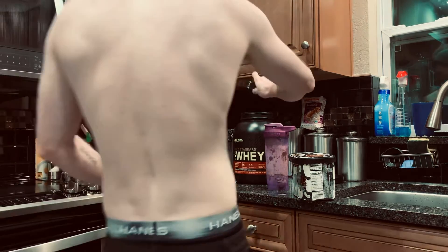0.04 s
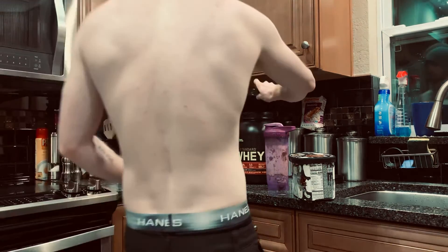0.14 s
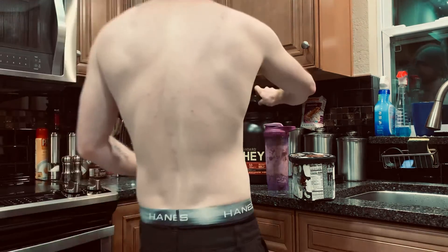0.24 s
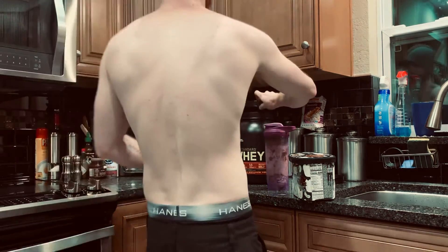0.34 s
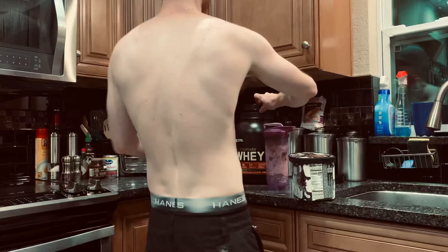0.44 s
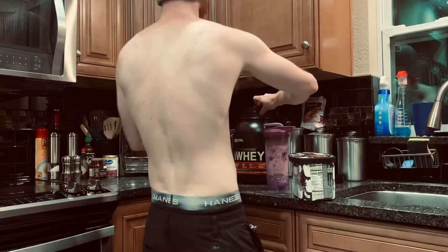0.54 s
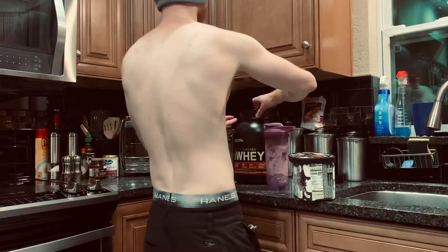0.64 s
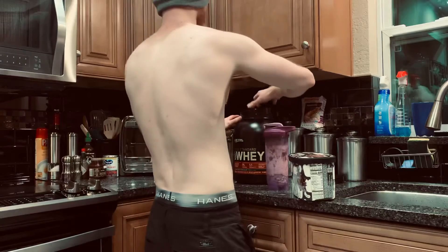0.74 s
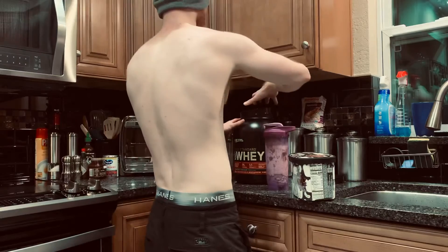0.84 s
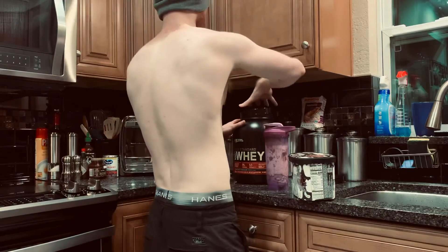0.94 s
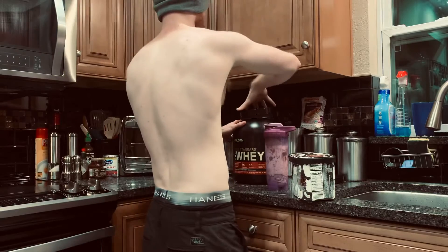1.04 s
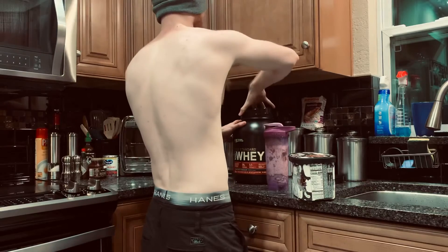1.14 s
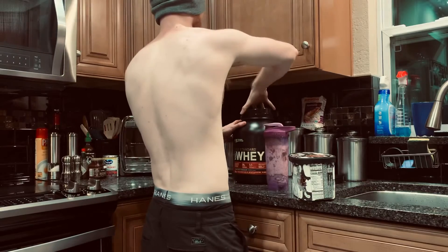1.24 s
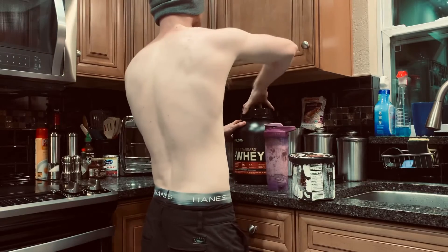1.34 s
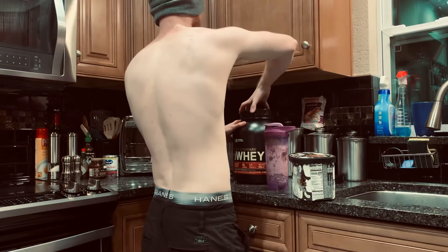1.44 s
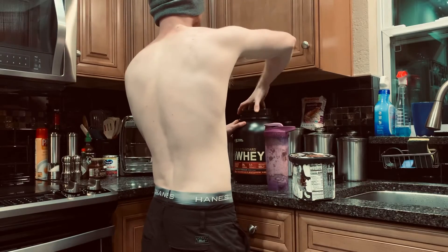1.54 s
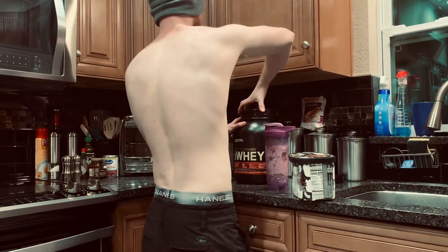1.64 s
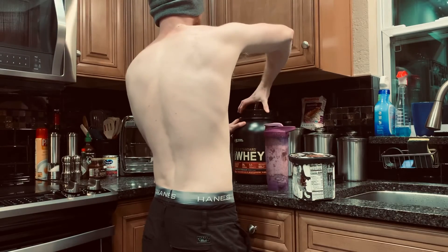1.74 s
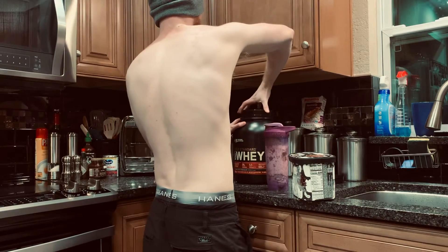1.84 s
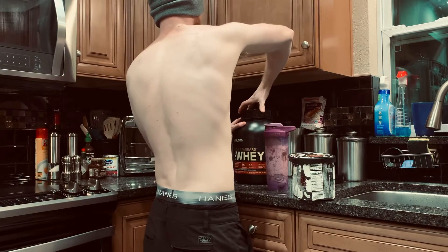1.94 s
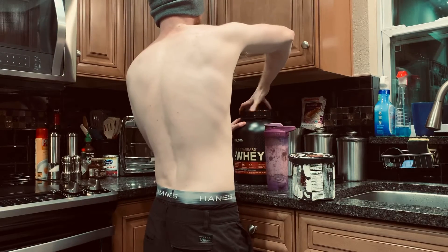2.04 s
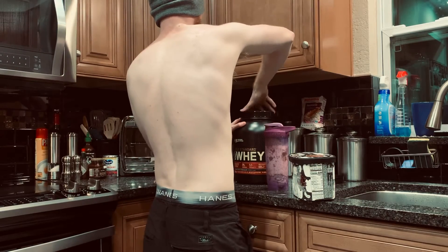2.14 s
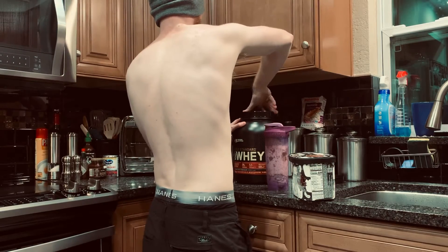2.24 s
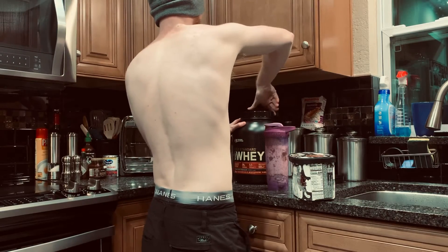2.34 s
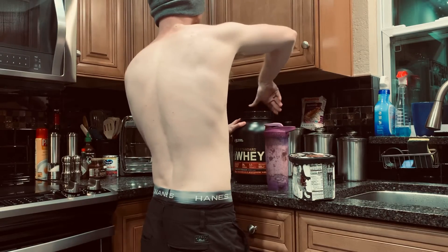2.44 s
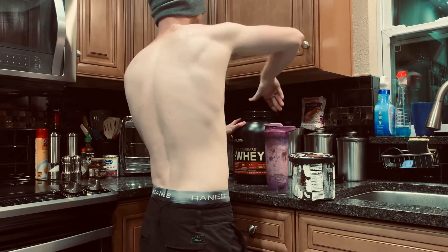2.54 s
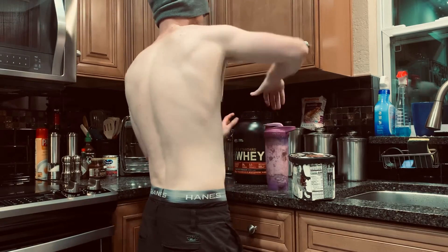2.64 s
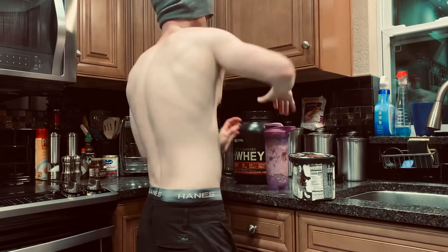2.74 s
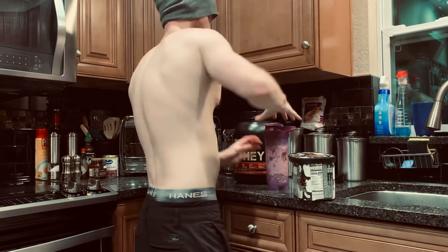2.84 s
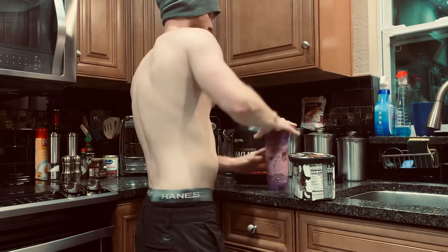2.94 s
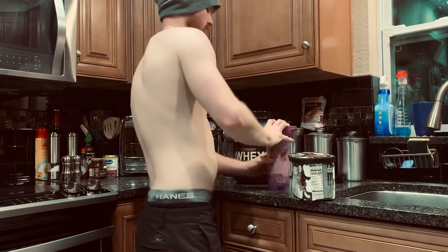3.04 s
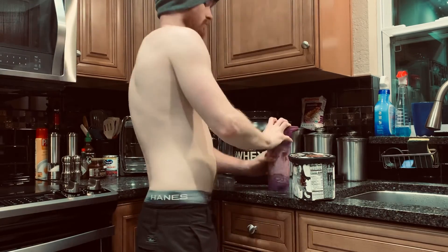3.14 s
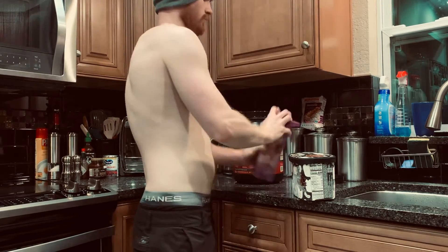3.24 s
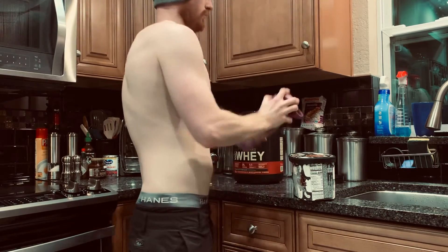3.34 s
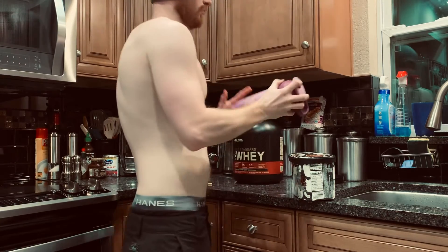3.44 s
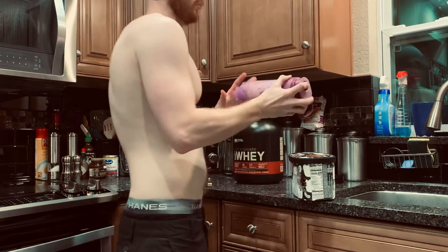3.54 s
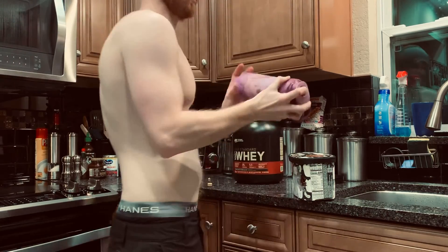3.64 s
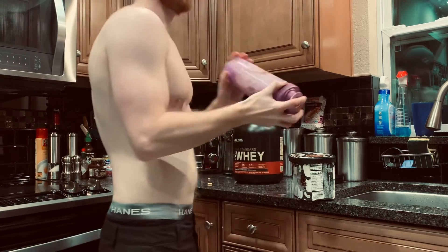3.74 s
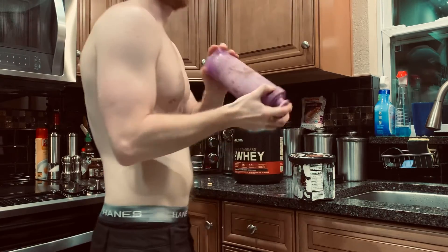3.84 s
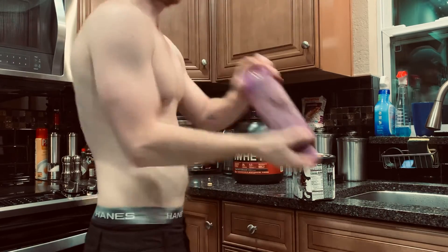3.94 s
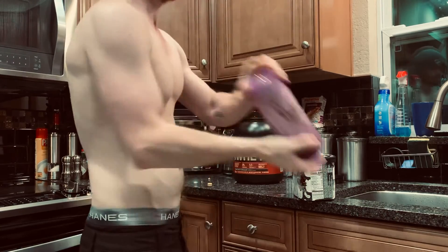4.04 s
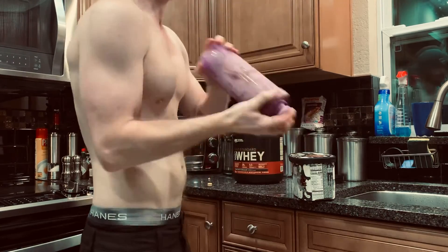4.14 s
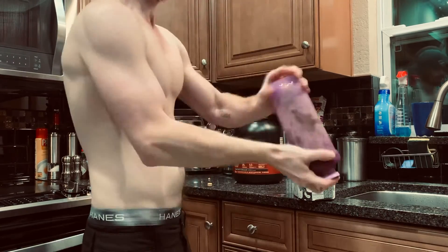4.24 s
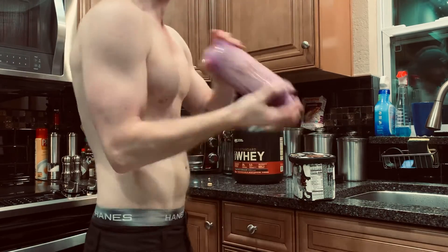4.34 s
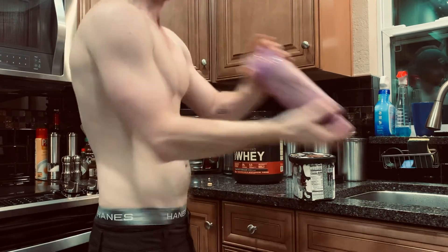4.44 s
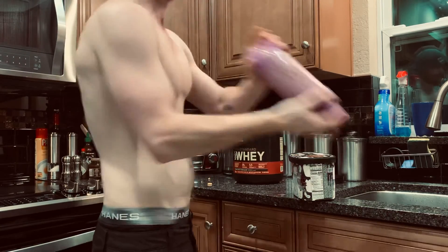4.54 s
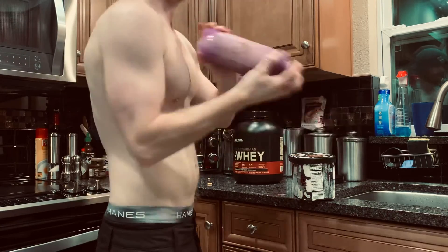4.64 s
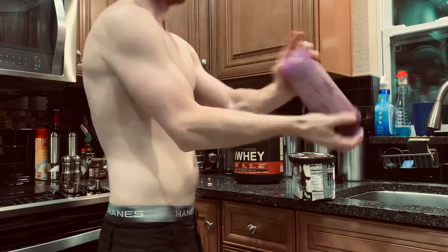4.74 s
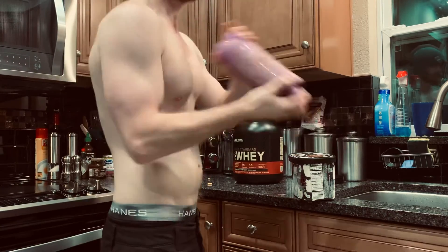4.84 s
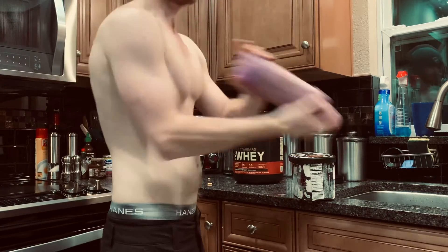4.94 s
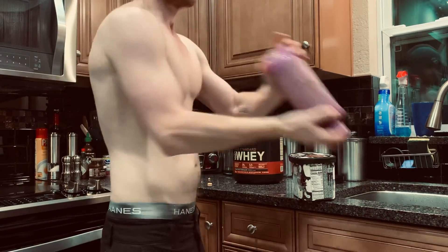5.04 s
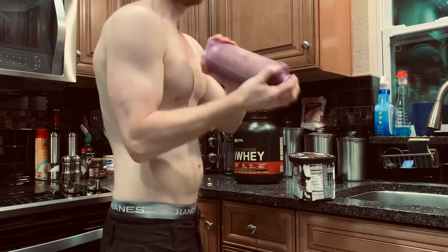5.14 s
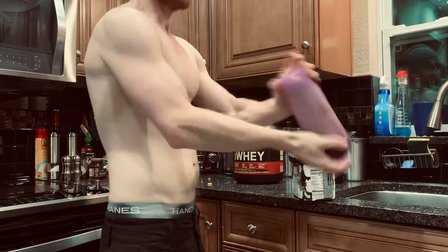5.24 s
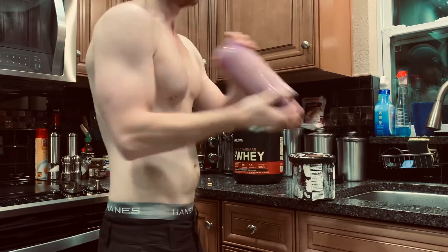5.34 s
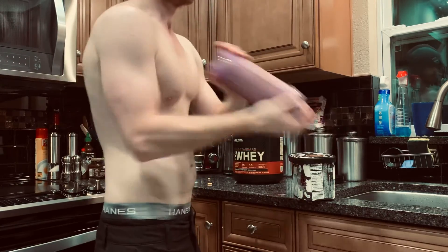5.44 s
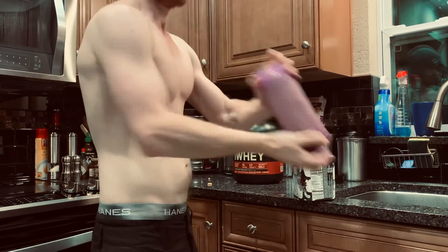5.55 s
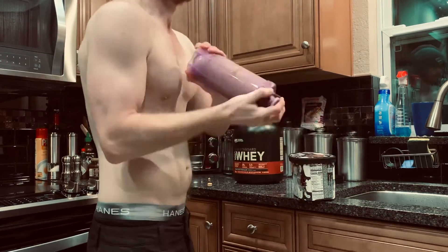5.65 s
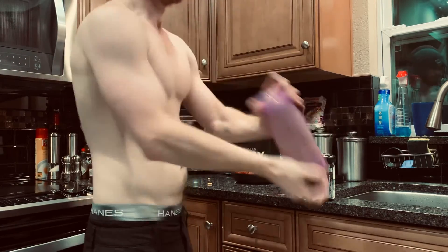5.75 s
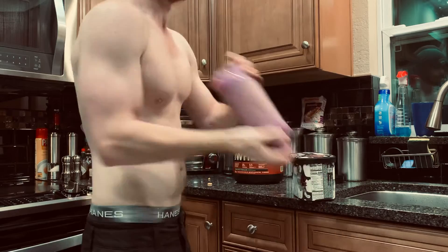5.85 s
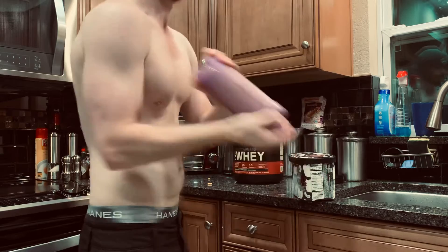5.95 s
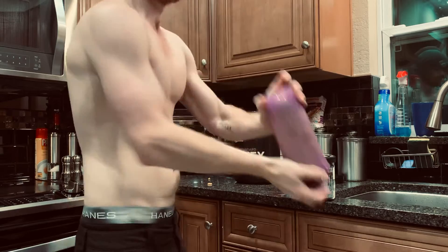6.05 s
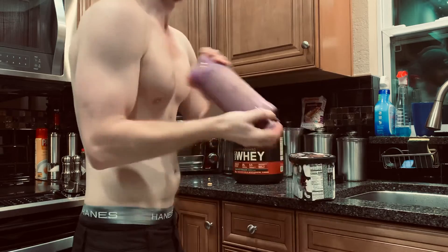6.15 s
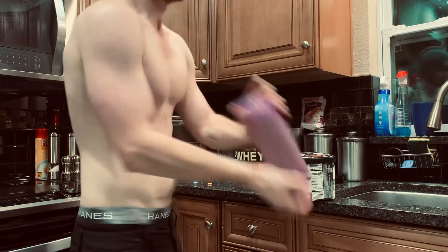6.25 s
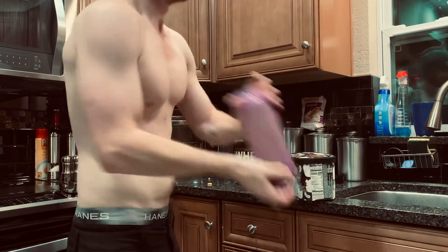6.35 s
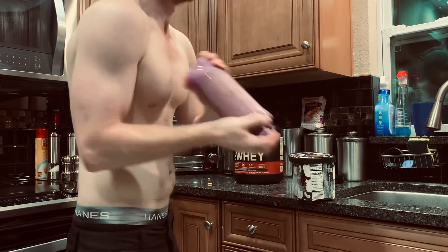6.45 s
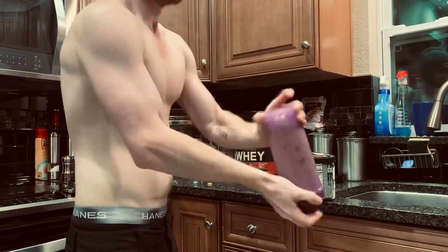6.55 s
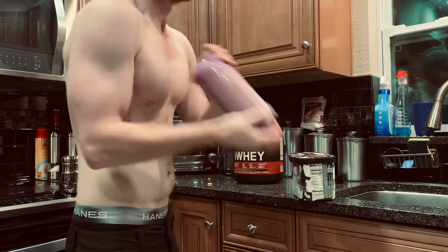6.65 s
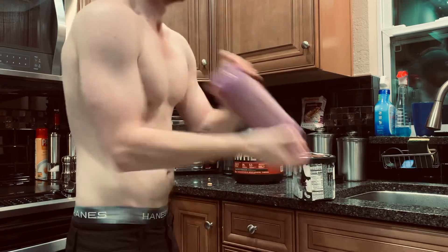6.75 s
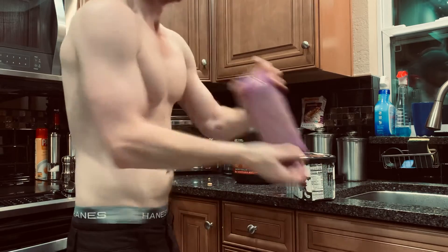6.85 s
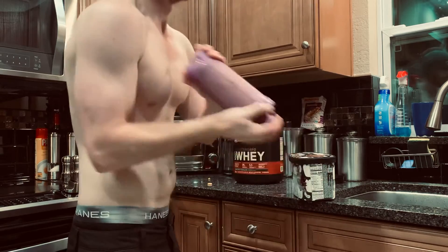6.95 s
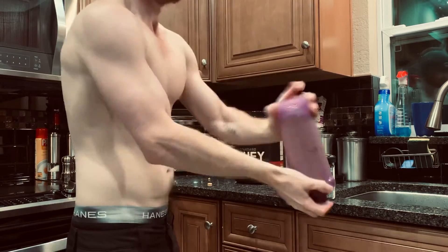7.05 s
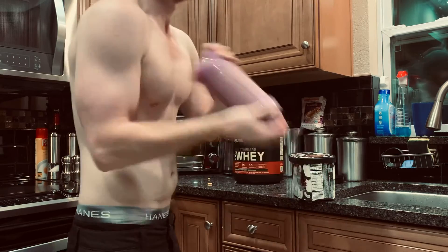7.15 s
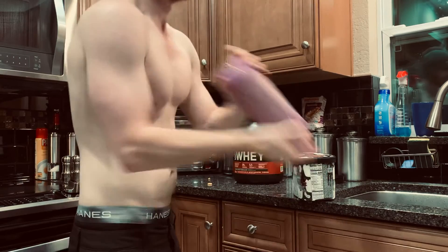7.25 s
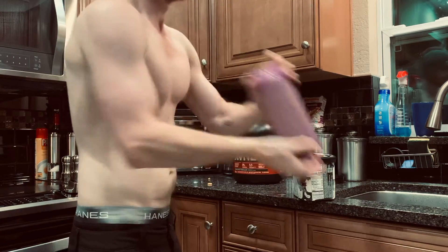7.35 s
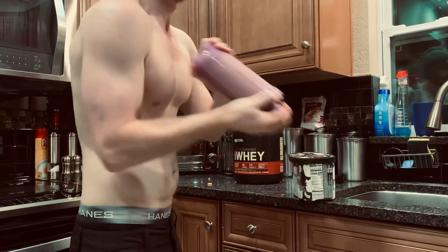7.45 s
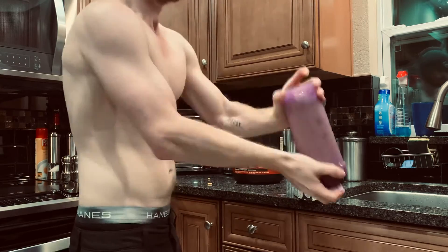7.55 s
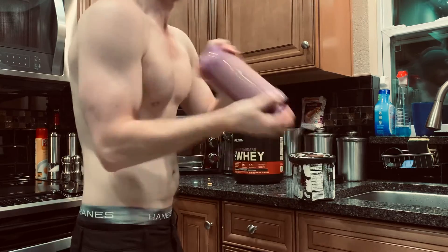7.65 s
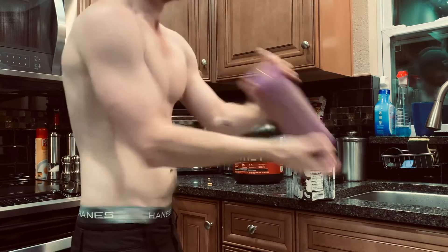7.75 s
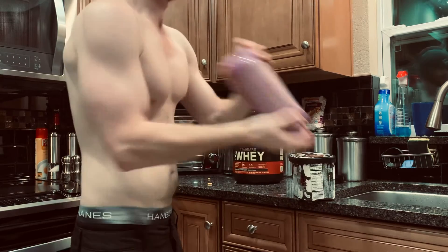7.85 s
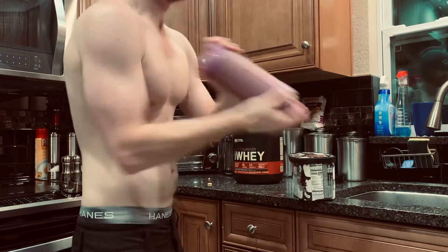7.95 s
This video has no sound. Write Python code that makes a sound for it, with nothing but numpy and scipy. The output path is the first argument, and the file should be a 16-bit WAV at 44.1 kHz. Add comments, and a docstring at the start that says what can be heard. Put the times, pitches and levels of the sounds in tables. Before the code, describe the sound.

A plastic lid clatters and scrapes onto a hollow tub, fingers rub, then thick liquid is shaken hard in a plastic bottle over a low kitchen hum.

```python
"""Thick liquid shaken in a plastic bottle: splash noise in the wall's resonances, sine glugs, fine fizz, ticks.
Before it, a plastic lid is dropped on a hollow tub and twisted shut: grainy noise through the lid's
resonances for knocks and scrapes, decaying sines for the tub, bright hiss for sliding fingers.
Under it all an appliance hums in a small kitchen: shaped noise and narrow wavering bands.
The stereo image is wide in the middle range, and the treble's phase differs in steps from left to right."""
import sys
import numpy as np
from scipy import signal
from scipy.fft import rfft, irfft, next_fast_len
from scipy.io import wavfile
from scipy.ndimage import uniform_filter1d, map_coordinates

SR = 44100
rng = np.random.default_rng(int(sys.argv[2]) if len(sys.argv) > 2 else 0)


def field_ratio(decibels):
    """Amplitude ratio for a level in dB (20 dB per decade); scalars and array-likes work."""
    return 10 ** (np.asarray(decibels, dtype=float) / 20)


def wrap_up_sound(samples):
    """Save the sound to the file named by the first command line argument, as 16-bit audio."""
    columns = np.atleast_2d(samples).T
    # keep every value between -1 and 1, then stretch to whole-number steps
    tamed = np.clip(columns, -1, 1)
    steps = np.round(tamed * 32767).astype(np.int16)
    wavfile.write(sys.argv[1], SR, steps)


N = 353241
SHAKE_START_S = 3.6  # the grip's scrape stops and the liquid starts to churn

# modes of the tub's air and walls: f/Hz, level/dB
TUB_MODES = [(155, -3.5), (192, 3), (226, 0), (290, -5.5)]
# resonances of the lid: f/Hz, width/Hz, level/dB
LID_RESONANCES = [(780, 290, 0), (1300, 390, 3), (1806, 1030, -0.5), (2950, 1800, -4.5), (3910, 590, -4.5),
                  (7900, 4000, -28)]
# liquid reaching the cap and the base in turn, cap first: t/s, splash level/dB, fizz over splash/dB, hold/s
LIQUID_SLAMS = [(3.932, -73, 11, 0.025), (4.028, -38, -0.5, 0.013), (4.178, -56.5, 4, 0.047),
                (4.273, -43, 0, 0.03), (4.408, -53.5, 0.5, 0.045), (4.52, -43.5, 0, 0.031),
                (4.663, -52, 2, 0.059), (4.783, -42, -3.5, 0.026), (4.923, -54.5, -3, 0.031),
                (5.027, -49, 0.5, 0.036), (5.176, -49.5, -0.5, 0.032), (5.292, -41, -6.5, 0.01),
                (5.411, -52.5, -0.5, 0.055), (5.548, -46, -1, 0.042), (5.676, -50.5, -3, 0.044),
                (5.796, -46.5, 1.5, 0.053), (5.944, -54, -3.5, 0.027), (6.053, -47.5, 0.5, 0.029),
                (6.207, -53.5, -1, .01), (6.316, -46.5, 4, 0.027), (6.461, -55, 4, 0.053),
                (6.576, -48.5, -5, .045), (6.712, -50, -0.5, 0.041), (6.834, -46, -1.5, 0.034),
                (6.963, -51, -1.5, 0.029), (7.072, -48, 0.5, 0.045), (7.211, -52, 2.5, 0.057),
                (7.34, -44, -2.5, 0.021), (7.458, -51, -5.5, 0.037), (7.57, -43, -3, 0.018),
                (7.697, -49, 0, 0.023), (7.805, -47, -3, 0.034), (7.945, -50.5, -3, 0.042)]


def unit(x):
    """Scaled to rms 1."""
    return x / np.sqrt(np.mean(x ** 2) + 1e-20)


def along(points, hz):
    """(Hz, value) points read on a log frequency axis."""
    f, v = np.transpose(points)
    return np.interp(np.log(hz + 1), np.log(f + 1), v)


def filtered(x, response):
    """x times a complex response of frequency."""
    m = next_fast_len(x.shape[-1] + 8192)
    spectrum = rfft(x, m) * response(np.fft.rfftfreq(m, 1 / SR))
    return irfft(spectrum, m)[..., :x.shape[-1]]


def resonant(x, peaks, slope_db=0):
    """x through parallel (Hz, width Hz, dB) resonances of alternating sign, tilted by slope_db per octave."""
    def response(f):
        body = 0
        for k, (centre, width, db) in enumerate(peaks):
            damping = 1j * f * width
            body = body + (-1) ** k * field_ratio(db) * damping / (centre * centre - f * f + damping)
        return body * field_ratio(slope_db * np.log2((f + 100) / 2000))
    return filtered(x, response)


def coloured(x, spectrum):
    """x under a (Hz, dB) spectrum, rms 1."""
    return unit(filtered(x, lambda f: field_ratio(along(spectrum, f))))


def grit(length, spread_db, grain_s):
    """Noise whose level wanders at random, a new random value every grain_s."""
    grains = rng.standard_normal(int(length / SR / grain_s) + 4)
    size = map_coordinates(grains, [np.arange(length) / SR / grain_s], order=1)
    return unit(field_ratio(spread_db * np.clip(size, -2, 2)) * rng.standard_normal(length))


def add(track, s, sound):
    """Mixes a sound in at s seconds."""
    part = track[round(s * SR):][:len(sound)]
    part += sound[:len(part)]


def hum():
    """Appliance and room: diffuse shaped noise plus narrow noise bands heard as wavering tones, on two paths."""
    # broad noise: f/Hz, relative density/dB per Hz
    hum_spectrum = [(15, -48), (25, -38), (48, -12), (70, 0), (87, -3.5), (153, -9.5), (185, -0.5),
                    (285, -3), (344, -8.5), (476, -9.5), (624, -12), (1070, -20), (1330, -20.5),
                    (1940, -24.5), (16000, -85)]
    # wavering appliance tones: f/Hz, width/Hz, level/dB
    drones = [(61, 15.4, -55), (157, 5.7, -56.5), (365, 13, -65.5)]
    paths = []
    for _ in range(2):
        tones = np.zeros(N)
        for hz, width, db in drones:
            tones += field_ratio(db) * unit(resonant(rng.standard_normal(N), [(hz, width, 0)]))
        noise = coloured(grit(N, spread_db=0.5, grain_s=0.071), hum_spectrum)
        paths.append(tones + field_ratio(-55) * noise)
    return np.array(paths)


def rubbing():
    """Friction noise: sliding skin hisses, the lid's thread scrapes, and the tub booms softly under the scrape."""
    # strokes of fingers and lid on plastic: t of the peak/s, build-up/s, hiss level/dB, scrape level/dB, t60/s
    slides = [(0, .03, -56, -61.5, 0.51), (.2, 0.026, -43, -81, .16), (.28, .05, -50, -73, 0.5),
              (.44, 0.013, -67, -51, 0.081), (.54, 0.076, -58.5, -50, 0.45), (0.642, 0.064, -47, -39, 0.18),
              (.72, 0.023, -46.5, -70, 0.26), (.79, .03, -60, -65, 0.17), (1.138, 0.033, -84, -51.5, 0.17),
              (1.45, .14, -43.5, -52.5, 0.34), (1.6, 0.059, -50, -59, 0.58),
              (1.712, 0.05, -45.5, -50.5, 0.21), (2.05, 0.16, -41, -50.5, 0.57),
              (2.111, 0.034, -37.5, -69, 0.37), (2.202, 0.024, -38, -41.5, 0.24),
              (2.85, 0.091, -56, -69, 0.35), (2.905, 0.063, -58, -78, 0.08), (3.09, 0.1, -57, -69.5, 0.76),
              (3.38, 0.034, -48, -78, 0.24), (3.76, 0.043, -51, -73, 0.21), (3.82, 0.034, -66, -76, 0.12),
              (3.99, 0.067, -48, -61, 0.075), (4.022, 0.0057, -47, -61, .1)]
    # hiss of skin on plastic: f/Hz, relative density/dB per Hz
    skin_spectrum = [(2500, -8.5), (4500, -5.5), (7000, -0.5), (8500, 5), (10500, -3), (13000, -5),
                     (15000, -15.5), (16000, -0.5)]
    swell_db, touch_s = 15.5, 0.0096  # growth over the build-up; time the first touch takes to rise 60 dB
    grip_db, hollow_db = -69, 1  # faint steady scrape of the grip; tub over scrape
    t = np.arange(N) / SR
    hiss_gain = np.zeros(N)
    scrape_gain = field_ratio(grip_db) * (t < SHAKE_START_S)
    for s, build, hiss_db, scrape_db, t60 in slides:
        early, late = np.maximum(s - t, 0), np.maximum(t - s, 0)
        swell = -swell_db * np.minimum(early / build, 1)
        touch = -60 * np.maximum(early - build, 0) / touch_s
        stroke = field_ratio(swell + touch - 60 * late / t60)
        hiss_gain = hiss_gain + field_ratio(hiss_db) * stroke
        scrape_gain = scrape_gain + field_ratio(scrape_db) * stroke
    hiss = coloured(grit(N, spread_db=1.0, grain_s=0.006), skin_spectrum)
    scrape = unit(resonant(grit(N, spread_db=1.5, grain_s=0.0047), LID_RESONANCES))
    damped_modes = [(hz, 30, db) for hz, db in TUB_MODES]  # rubbing damps the modes
    hollow = unit(resonant(rng.standard_normal(N), damped_modes))
    return hiss_gain * hiss + scrape_gain * (scrape + field_ratio(hollow_db) * hollow)


def knocks():
    """Noise blows excite the lid, which cracks and clatters; some thud on the counter, some leave a ring."""
    # lid and bottle knocks: t/s, peak level/dB, clatter t60/s, brightness/dB per octave, clack f/Hz
    clatters = [(.182, -59, .14, 7, 1630), (0.437, -22.5, 0.082, -1, 2950), (.445, -22.5, 0.12, 1, 2150),
                (0.45, -22, 0.26, -1, 1890), (.562, -35, 0.25, 4, 1820), (0.627, -23.5, 0.26, -18, 980),
                (1.132, -42.5, 0.48, -10.5, 1300), (1.453, -27, 0.2, 0, 1500),
                (1.716, -33.5, 0.18, -1, 1060), (2.022, -42, .11, -6, 1330), (2.191, -44, .079, -1, 3020),
                (2.195, -24.5, 0.32, 3.5, 1718), (3.153, -37, 0.13, -17, 695)]
    # dull blows on the counter: t/s, peak level/dB
    thuds = [(.562, -49), (0.628, -46), (1.132, -55), (1.454, -38.5), (2.191, -26.5), (3.09, -43),
             (3.122, -43.5), (3.153, -40.5), (3.162, -48), (3.174, -45), (3.188, -50), (3.327, -42)]
    # the lid rings on: t/s, peak level/dB
    lingering = [(0.452, -40), (2.195, -33)]
    # ringing modes of the lid: f/Hz, level/dB, t60/s
    lid_ring = [(1080, -13, 0.3), (1210, -4, 0.14), (1630, -3, 0.49), (1840, -6, 0.27), (2200, -12, 0.29),
                (2697, -13, 0.25), (3120, -22, 0.46)]
    out, t = np.zeros(N), np.arange(SR // 2) / SR

    def blow(t60):
        decay = field_ratio(-60 * t / t60) + field_ratio(-60 * t / 0.056)
        return grit(len(t), spread_db=3.5, grain_s=0.0019) * decay * (1 - np.exp(-t / 0.00064))

    def place(s, db, sound):
        add(out, s, field_ratio(db) * sound / abs(sound).max())

    for s, db, t60, slope_db, clack_hz in clatters:
        place(s, db, resonant(blow(t60), LID_RESONANCES + [(clack_hz, 180, 5)], slope_db))
    for s, db in thuds:
        place(s, db, resonant(blow(0.035), [(366, 61, 0)]))
    # a mode's width follows from its decay time
    ring_modes = [(hz, np.log(1000) / np.pi / t60, level) for hz, level, t60 in lid_ring]
    for s, db in lingering:
        place(s, db, resonant(blow(0.07), ring_modes))
    return out


def booms(turn):
    """The hollow tub is bumped: its modes ring as sines, loudest those near the favoured pitch."""
    # bumps: t/s, level/dB, favoured f/Hz, t60/s
    bumps = [(0.199, -30, 166, 0.16), (0.442, -19.5, 229, 0.074), (0.486, -32, 236, 0.1),
             (0.545, -42, 179, 0.18), (0.626, -20.5, 188.4, 0.16), (1.13, -38.5, 192, 0.14),
             (1.458, -24.5, 180.4, 0.076), (1.641, -37, 190.6, 0.23), (1.781, -42, 196, 0.15),
             (1.889, -41, 156, 0.11), (1.956, -40, 147, 0.19), (2.026, -37, 190, 0.13),
             (2.081, -45, 192, 0.1), (2.114, -51, 227, 0.18), (2.19, -32, 226, 0.045),
             (2.706, -39.5, 166, 0.13), (3.116, -41, 153, 0.13), (3.89, -45, 158, 0.25)]
    out, t = np.zeros(N), np.arange(SR // 3) / SR
    for s, db, bump_hz, t60 in bumps:
        ring = np.zeros(len(t))
        for hz, level in TUB_MODES:
            off_db = 70 * abs(np.log2(hz / bump_hz))  # 70 dB down per octave away
            ring += field_ratio(level - off_db) * np.sin(2 * np.pi * hz * t + turn)
        add(out, s, field_ratio(db - 60 * t / t60) * (1 - np.exp(-t / 0.0037)) * ring)
    return out


def churn():
    """Lumpy low noise, faded in once: liquid keeps gurgling between the slams."""
    moving = np.clip((np.arange(N) / SR - SHAKE_START_S) / 0.45, 0, 1)
    # (Hz, relative dB per Hz)
    wash = [(150, 13), (300, 2.0), (600, 2.5), (2000, 2.5), (5000, -3), (12000, -17.0), (16000, -48)]
    lumpy = grit(N, spread_db=3, grain_s=.025)
    return field_ratio(-54.5) * moving * coloured(lumpy, wash)


def bubbles(length, centre_hz, count):
    """Short damped tones of small air cells and drops, pitch scattered round a centre and rising."""
    draw, t = rng.random((count, 3)), np.arange(SR // 70) / SR
    hz = centre_hz * np.exp(0.34 * rng.standard_normal((count, 1)))
    size = field_ratio(np.minimum(-3.5 * np.log(1 - draw[:, 1:2]), 9))  # a few stand out, by 9 dB at most
    envelope = np.exp(-t * hz / 4) * (1 - np.exp(-t * hz))
    cells = size * envelope * np.sin(2 * np.pi * hz * t * (1 + 6 * t))
    at = (draw[:, :1] * length).astype(int) + np.arange(len(t))
    return unit(np.bincount(at.ravel(), cells.ravel(), minlength=length)[:length])


def slosh():
    """Each slam is a burst of splash in the bottle wall, bubbles, a dull thump and fine fizz."""
    # resonances of the bottle wall: f/Hz, width/Hz, level/dB
    bottle = [(1050, 830, -7.5), (2056, 360, 6), (2500, 1380, -3.5), (4660, 940, -8)]
    # fizz of fine bubbles: f/Hz, relative density/dB per Hz
    fizz_spectrum = [(2500, -1.5), (4000, -4.5), (7000, 2), (9000, 3), (11000, -7), (13000, -7.5),
                     (15000, -24), (16000, -6.5)]
    # cap, then base: splash f/Hz, rise/s, t60/s
    bottle_ends = [(1802, 0.0041, 0.26), (2140, 0.0058, 0.25)]
    # brightness of the splash over time: t/s, tilt/dB per octave
    splash_tilt = [(3.9, 6), (4.7, 2), (5.5, -0.5), (6.3, 0.5), (7.1, .5), (7.6, -0.5), (8, 4.5)]
    glug_peaks = [(282, 163, -2), (560, 186, -1.5), (846, 580, -8.0)]  # (Hz, width Hz, dB)
    middling_slam_db, middling_thump_db, thump_grows = -48, -48.5, 0.38  # growth in dB per dB of slam
    out, t = np.zeros(N), np.arange(SR // 3) / SR
    for k, (s, db, fizz_db, hold) in enumerate(LIQUID_SLAMS):
        end_hz, rise, t60 = bottle_ends[k % 2]
        splash_hz = end_hz * np.exp(0.079 * rng.standard_normal())
        surge = (1 - np.exp(-t / rise)) * field_ratio(-60 * np.maximum(t - hold, 0) / t60)
        wall = bottle + [(splash_hz, 150, 4)]  # one wall resonance varies at random from slam to slam
        slope_db = np.interp(s, *np.transpose(splash_tilt))
        splash = unit(resonant(grit(len(t), spread_db=-0.5, grain_s=0.00406), wall, slope_db))
        froth = field_ratio(-3.0) * bubbles(len(t), splash_hz, count=110)
        fizz = field_ratio(fizz_db) * coloured(grit(len(t), spread_db=2.5, grain_s=0.0018), fizz_spectrum)
        glug = unit(resonant(grit(len(t), spread_db=1, grain_s=0.0079), glug_peaks))
        thump = glug + field_ratio(-5.5) * bubbles(len(t), 516, count=50)
        thump_db = middling_thump_db + thump_grows * (db - middling_slam_db)
        add(out, s, surge * (field_ratio(db) * (splash + froth + fizz) + field_ratio(thump_db) * thump))
    return out


def gulps(turn):
    """Pockets of trapped air ring briefly as sines, their pitch rising as they close."""
    # big pockets bursting: t/s, level/dB, f/Hz
    big = [(4.035, -34.5, 368), (4.286, -34, 557), (4.418, -41, 740), (4.44, -37.5, 550), (4.693, -36, 562),
           (4.795, -39, 810), (5.041, -34, 528), (5.07, -37, 603), (5.213, -46, 416), (5.301, -37, 783),
           (5.688, -33, 440), (5.958, -38, 465), (6.051, -35.5, 527), (6.212, -38.5, 512),
           (6.597, -30, 513), (6.842, -32, 540), (7.013, -40, 298), (7.08, -36.5, 354), (7.11, -40, 594),
           (7.215, -35.5, 527), (7.245, -35, 526), (7.343, -40, 443), (7.589, -35, 428),
           (7.815, -29.5, 466)]
    out, t = np.zeros(N), np.arange(SR // 5) / SR
    small = []  # each slam also frees one small pocket, a little late
    for slam in LIQUID_SLAMS:
        a, b, c = rng.standard_normal(3)
        small.append((slam[0] + 0.05 * abs(a), -45 + 3 * b, 432 * np.exp(0.27 * c)))
    for s, db, hz in big + small:
        phase = 2 * np.pi * hz * (0.966 * t + 1.12 * t ** 2) + turn
        envelope = field_ratio(db - 60 * t / 0.059) * (1 - np.exp(-t / 0.0034))
        add(out, s, envelope * np.sin(phase))
    return out


def ticks(turn):
    """The mixing ball strikes the wall: a sharp damped sine, then a short bright rattle of grainy noise."""
    # strikes: t/s, tick level/dB, rattle over tick/dB
    strikes = [(4.045, -35, -11), (5.301, -34, -12), (5.342, -38, -15), (6.762, -34, -14),
               (6.882, -17.5, -22), (7.2499, -30, -16), (7.3644, -26, -8), (7.3997, -31, -10),
               (7.5772, -30, -13)]
    rattle_peaks = [(2780, 1500, -9.5), (2800, 3800, -16)]  # (Hz, width Hz, dB)
    out, t = np.zeros(N), np.arange(SR // 5) / SR
    for s, db, rattle_db in strikes:
        tick = field_ratio(-60 * t / .004) * np.sin(2 * np.pi * 2200 * t + turn)
        rattle = unit(resonant(grit(len(t), spread_db=7, grain_s=0.0013), rattle_peaks))
        add(out, s, field_ratio(db) * (tick + field_ratio(rattle_db - 60 * t / 0.17) * rattle))
    return out


def counter(turn):
    """Blows and pockets of air; fresh grain on every call, tones turned in phase by turn radians."""
    return knocks() + booms(turn) + gulps(turn) + ticks(turn)


def patchy(x, depth_db):
    """Random swells and hollows, some 500 Hz by 25 ms, the same along every path."""
    z = signal.stft(x, nperseg=512, noverlap=384)[2]
    field = rng.standard_normal(z.shape[1:])
    for _ in range(2):
        field = uniform_filter1d(field, size=5, axis=0)  # over frequency
        field = uniform_filter1d(field, size=6, axis=1)  # over time
    gain = field_ratio(depth_db * np.clip(unit(field), -2, 2))
    return signal.istft(z * unit(gain), nperseg=512, noverlap=384)[1][:, :N]


def room_echo(paths):
    """Reverb: each path convolved with its own decaying noise tail of energy 1, 300 samples late."""
    # decay of the room: f/Hz, t60/s
    room_decay = [(150, 0.27), (1000, 0.38), (4000, 0.48), (12000, 0.15)]
    hz, t, z = signal.stft(rng.standard_normal((2, SR // 2)), SR, nperseg=128)
    decay = field_ratio(-60 * t / along(room_decay, hz)[:, None])
    tail = signal.istft(z * decay, SR, nperseg=128)[1]
    tail = tail / np.linalg.norm(tail, axis=1, keepdims=True)
    return signal.fftconvolve(np.pad(paths, ((0, 0), (300, 0))), tail, axes=1)[:, :N]


def scene():
    """Two alike renderings of it all: fresh noise in each, struck tones a quarter turn apart, reverb and hum."""
    liquid = patchy(np.array([slosh() + churn() for _ in range(2)]), depth_db=3.0)
    hands = patchy(np.array([rubbing() for _ in range(2)]), depth_db=3.0)
    paths = np.array([counter(0), counter(np.pi / 2)]) + liquid + hands
    return paths + field_ratio(-10.0) * room_echo(paths) + hum()


def band_limit(x):
    """A steep low-pass at the top of the band."""
    return signal.sosfilt(signal.butter(12, 16660, fs=SR, output="sos"), x)


def record(dry):
    """Two close ports share bass and treble and differ in between; the treble's phase differs left to right."""
    # left-right likeness: f/Hz, correlation from 0 to 1
    likeness = [(60, .91), (160, .86), (300, .74), (740, .45), (1300, .22), (2500, .08), (4800, .1),
                (6500, .9), (8000, .99)]
    # stepped left-right phase of the treble, negative where the left is later: f/Hz, phase/rad
    treble_phase = [(6000, 0), (7200, -1), (8100, -2.95), (9000, -3.3), (9900, -5.6), (11900, -6.6),
                    (12700, -9.25), (14200, -9.6), (15000, -12.2), (15800, -12.7)]
    # left over right: f/Hz, level/dB
    left_lean = [(60, -1.5), (240, -0.5), (950, 1.5), (3770, -1), (15000, 3)]

    def shares(hz):
        angle = np.arccos(np.clip(along(likeness, hz), -1, 1)) / 2
        return np.array([np.cos(angle), np.sin(angle)])

    def port_response(hz):
        phase = np.exp(.5j * np.outer([1, -1], along(treble_phase, hz)))
        lean = field_ratio(np.outer([.5, -.5], along(left_lean, hz)))
        low_cut = 1 / np.sqrt(1 + (38 / (hz + 1)) ** 4)
        return phase * lean * low_cut * (hz < 15850)

    common, apart = filtered(dry, shares)
    ports = filtered(np.array([common + apart, common - apart]), port_response)
    return band_limit(ports)


dry = scene()
out = record(dry)
wrap_up_sound(out)
```